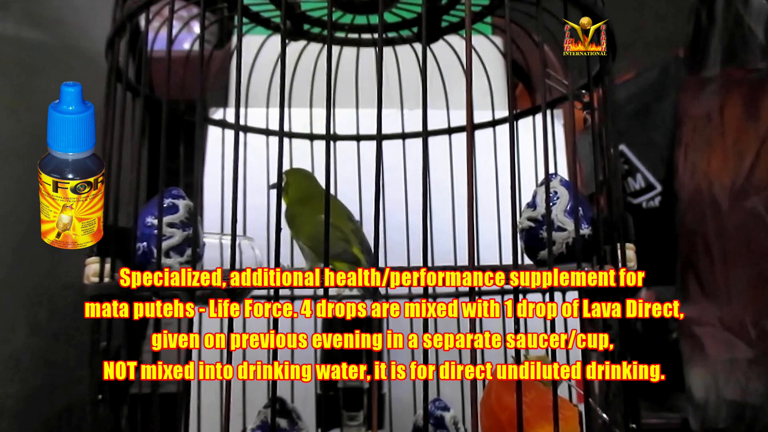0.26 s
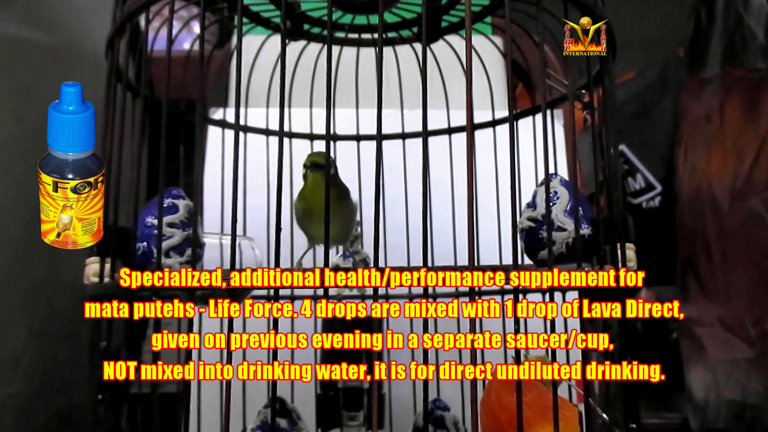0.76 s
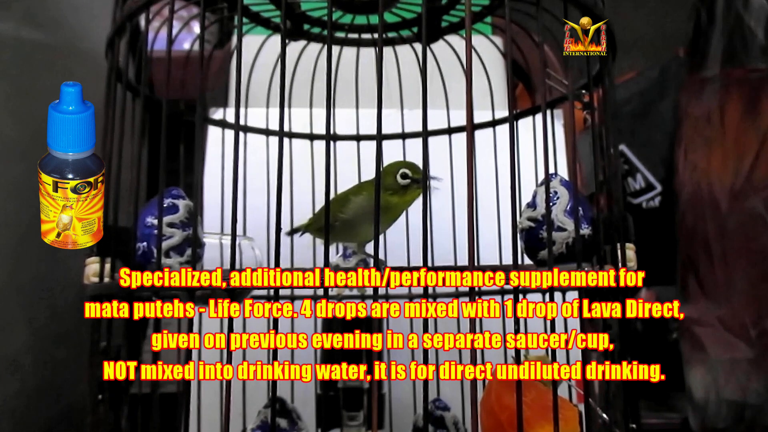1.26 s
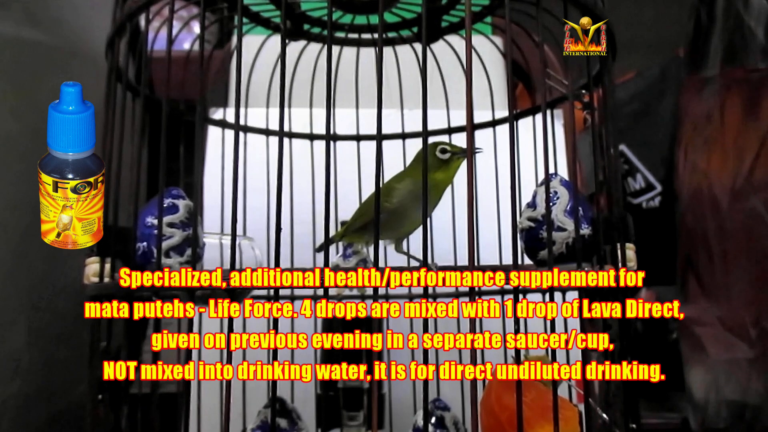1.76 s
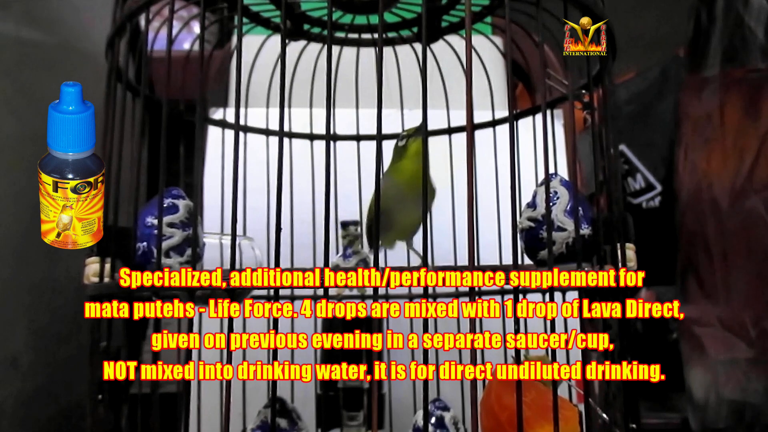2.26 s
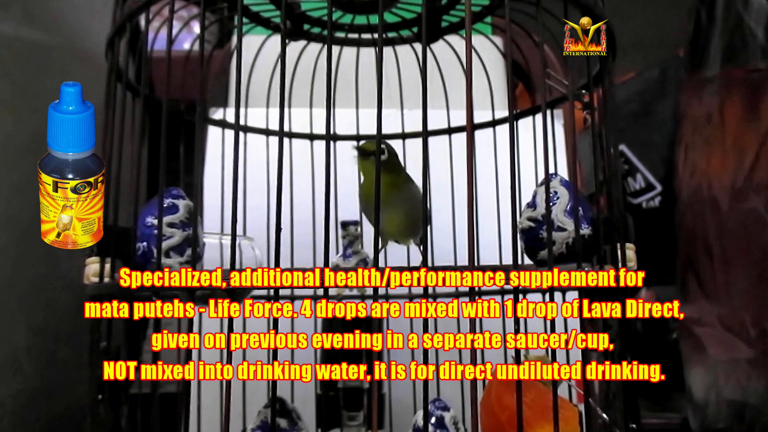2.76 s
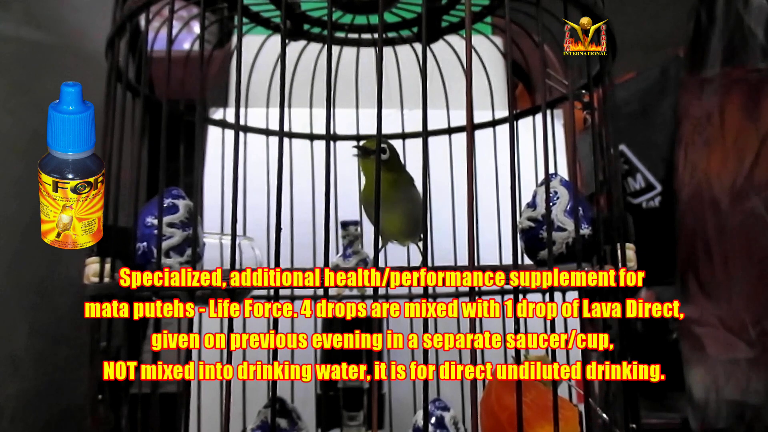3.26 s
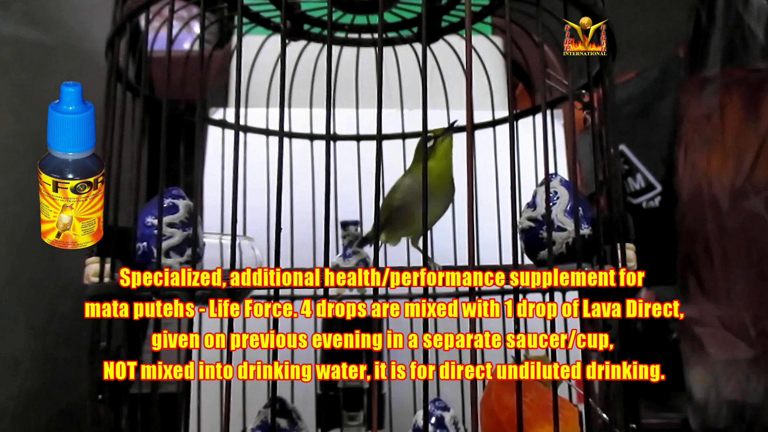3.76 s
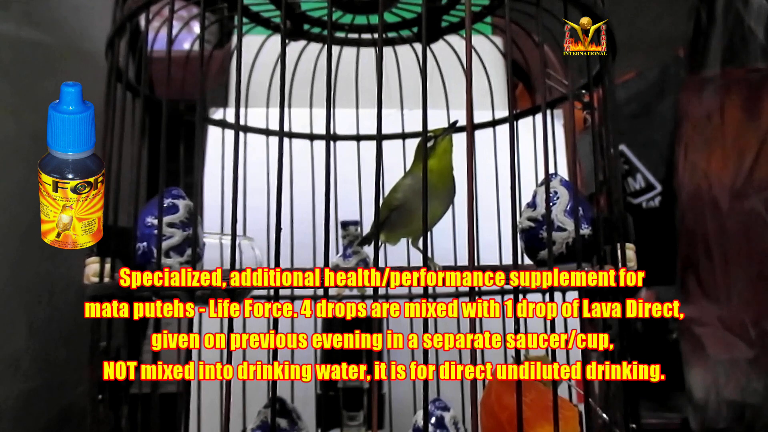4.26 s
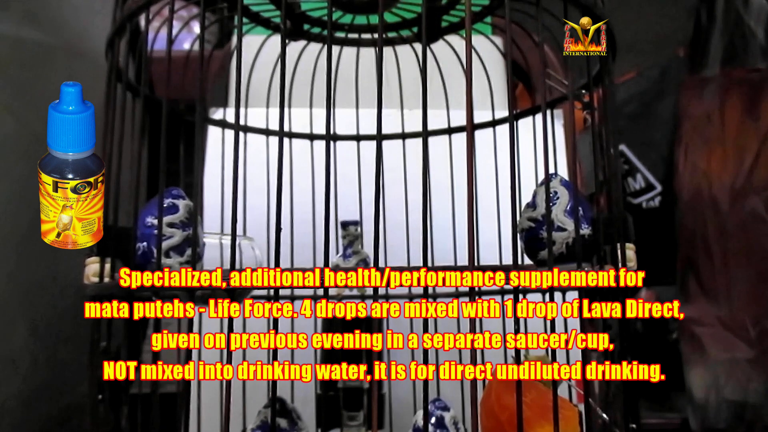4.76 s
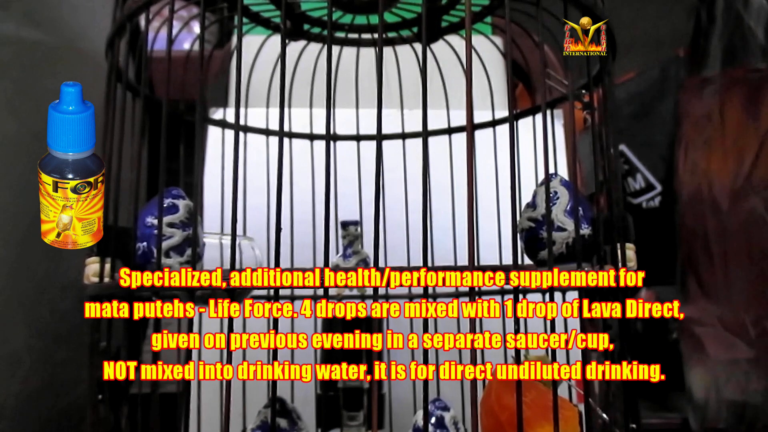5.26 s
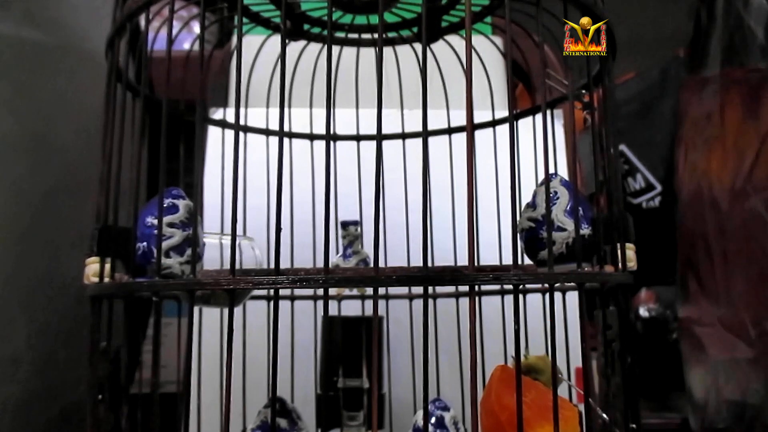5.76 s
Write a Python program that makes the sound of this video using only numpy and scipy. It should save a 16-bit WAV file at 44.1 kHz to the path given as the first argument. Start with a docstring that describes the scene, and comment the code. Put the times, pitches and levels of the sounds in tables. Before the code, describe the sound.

A small caged bird chirps close by in quick, high, falling notes, with a fainter bird answering over a low hum and distant traffic.

```python
"""Over an appliance hum and dull traffic, a caged white-eye starts a run of slurred, finely trilled chirps
close to the microphone. A hard wall returns each chirp once and the small room rings after it.
A second bird answers from further off. After a second or so the singer starts to flutter between phrases;
from two seconds on, some of its notes step down between two held pitches, and a far engine swells
and slowly gathers speed under the song until the end."""
import sys
import numpy as np
from scipy import signal
from scipy.fft import rfft, irfft
from scipy.io import wavfile
from scipy.ndimage import uniform_filter1d

SR = 44100
rng = np.random.default_rng(int(sys.argv[2]) if len(sys.argv) > 2 else 0)


def store_pcm(level_fs):
    """Save levels as 16-bit WAV."""
    pcm = np.round(np.clip(level_fs, -1, 1) * 32767).astype(np.int16)
    wavfile.write(sys.argv[1], SR, np.atleast_2d(pcm).T)


N = 265041

# what a bird's throat and beak let through: (frequency [Hz], gain [dB])
THROAT = [(2200, -15.5), (2900, -4), (3500, -7.5), (4500, 0.5), (5800, 5), (6800, -5), (8500, -11),
          (11000, -20.5), (15000, -24.5)]
TOP_HZ = 15450


def near_bird():
    """The caged singer; its snaps leave a nearly closed beak, so they stay dull and dry."""
    # falling chirps: (start [s], length [s], first pitch [Hz], crest pitch [Hz], last pitch [Hz],
    # time to crest [s], bend [1 straight, 3 drops fast and lingers], level [dB], opening flick [s],
    # overtones [dB], treble beamed at the wall [dB])
    slurs = [(-.008, .127, 5030, 4837, 3574, 0.0041, 1.46, -23.5, 0.0093, -34.5, 14),
             (.319, 0.15, 4720, 5160, 3680, 0.032, 1.34, -21.5, .011, -33, 11),
             (.612, 0.12, 5320, 5390, 3467, 0.0059, 1.4, -23.5, 0.0086, -42.5, 7),
             (0.881, .13, 4523, 4540, 3187, 0.034, 1.04, -23, 0.0086, -42.5, 10.5),
             (1.232, 0.091, 4230, 4050, 3320, 0.027, 2.65, -27, 0.0097, -43, 4),
             (1.394, .12, 5230, 5125, 3197, 0.024, 1.46, -22, .0096, -43.5, 21),
             (1.791, 0.12, 4980, 5190, 3170, 0.0053, 1.15, -23, 0.0076, -44.5, 9),
             (2.503, .12, 4640, 5085, 3415, 0.023, 2.9, -23, .01, -39.5, 13.5),
             (2.749, .126, 4530, 4673, 3290, 0.049, 1.05, -21, 0.0078, -44, -5),
             (3.134, 0.13, 5250, 5176, 3220, 0.0093, 1.32, -22, 0.0073, -42.5, 13.5),
             (3.407, .077, 4560, 4590, 3480, 0.0044, 2.3, -25.5, .011, -37, 13),
             (3.559, .128, 4370, 4565, 3155, 0.017, 1.22, -19.5, .01, -46.5, 25),
             (4.444, 0.092, 4534, 4475, 3817, 0.025, 2.9, -20, .014, -33.5, 19),
             (4.607, 0.13, 4040, 4880, 3407, 0.029, 1.73, -22, 0.0065, -32, 17.5),
             (4.904, .13, 5090, 5220, 3763, .027, 2.7, -23, 0.0099, -43, 1),
             (5.686, .12, 4794, 5054, 3395, .022, 2.45, -23, .01, -47, 11),
             (5.956, 0.087, 4492, 4750, 3250, 0.059, 1.3, -20.5, 0.0053, -41, -2)]
    # two-pitch chirps: (start [s], length [s], upper pitch [Hz], lower pitch [Hz], time to crest [s],
    # level [dB], overtones [dB], treble beamed at the wall [dB])
    steps = [(2.09, .12, 4670, 4140, 0.12, -13, -42.5, 10.5),
             (2.29, 0.1, 5660, 4855, 0.034, -21.5, -32.5, 18),
             (3.775, 0.088, 5626, 4788, 0.039, -21, -36.5, -6.5),
             (5.255, .13, 4580, 4131, 0.044, -19.5, -47, 9),
             (5.455, 0.099, 5790, 4870, 0.0068, -23, -31, 4.5)]
    song, beamed, snaps = np.zeros((3, N))
    for note, rows in ((slur, slurs), (step, steps)):
        for start, *shape, beam_db in rows:
            voice, onset = note(*shape)
            direct, to_wall = beak(voice, beam_db)
            add(song, start, direct)
            add(beamed, start, to_wall)
            add(snaps, start, onset)
    return echoes(song, beamed) + band(snaps, 1000, 10000)


def slur(length, first_hz, crest_hz, last_hz, crest_s, bend, db, flick_s, overtone_db,
         smooth_below_hz=3310, trill_onset_s=0.024):
    """The pitch leans to a crest and falls away; a late crest begins with hardly any trill."""
    t = np.linspace(0, length, 40)
    fall_left = np.clip((length - t) / (length - crest_s), 0, 1) ** bend
    pitches = np.interp(t, [0, crest_s], [first_hz, crest_hz]) - (crest_hz - last_hz) * (1 - fall_left)
    depth_hz = 0.13 * (crest_hz - smooth_below_hz)  # higher notes trill deeper
    early_hz = depth_hz * np.exp(-(crest_s / trill_onset_s) ** 2 / 2)
    levels_db = db + effort(t, crest_s)
    return chirp(length, pitches, levels_db, (early_hz, depth_hz), flick_s, overtone_db, falling=True)


def step(length, upper_hz, lower_hz, crest_s, db, overtone_db, depths_hz=(165, 150), flick_s=0.0078):
    """A trilled upper pitch drops quickly at mid-note to a pure, held lower one."""
    t = np.linspace(0, length, 40)
    dropped = (1 + np.tanh((t / length - .5) / .1)) / 2
    pitches = upper_hz + (lower_hz - upper_hz) * dropped
    return chirp(length, pitches, db + effort(t, crest_s), depths_hz, flick_s, overtone_db, falling=False)


def effort(t, crest_s, swell_db_per_s=135, ease_db_per_s=24.5, release_db_per_s=214, release_at_s=0.092):
    """A note's envelope in dB: effort swells until just past the crest, eases, gives out on long notes."""
    past_peak = t - crest_s - 0.0035
    return (swell_db_per_s * np.minimum(past_peak, 0) - ease_db_per_s * np.maximum(past_peak, 0)
            - release_db_per_s * np.maximum(t - release_at_s, 0))


def chirp(length, pitches, levels_db, depths_hz, flick_s, overtone_db, falling,
          trill_hz=110.3, scoop=0.52, sag_s=0.0031, jitter=.007, fade_s=0.0035):
    """One note and its opening snap: the syrinx flicks up to pitch, trills, then smooths out."""
    size = int(length * SR)
    t = np.arange(size) / SR
    progress = (t - flick_s) / (length - flick_s)
    flick_left = np.clip(1 - t / flick_s, 0, 1)
    trill = np.sin(turn(trill_hz * (1 + 0.098 * walk(60.4, size))) - 2 * np.pi * trill_hz * flick_s)
    early_hz, middle_hz = depths_hz
    depth_hz = np.interp(progress, [.1, .42, .68, 1], [early_hz, middle_hz, middle_hz / 5, 0])
    hz = (along(progress, pitches) + trill * depth_hz) * (1 - scoop * flick_left)
    # a falling note stumbles on its way down and sags as the syrinx closes
    stumble = .011 * walk(70, size) * np.clip(2 * progress, 0, 1)
    sag = 0.15 * np.exp((t - length) / sag_s)
    hz *= 1 + falling * (stumble - sag)
    # the voice is unsteady while it trills and almost pure otherwise
    unsteady = np.maximum(depth_hz / max(depths_hz), .25)
    phase = turn(hz * (1 + jitter * unsteady * walk(900, size)))
    db = along(progress, levels_db) + 2.5 * unsteady * walk(200, size)
    whistle = gain_at(hz, THROAT) * np.sin(phase) * undb(db) * (1 - flick_left) ** 2.18
    rasp_db = max(levels_db) + 0.51 * (db - max(levels_db))  # fades more slowly than the whistle
    edge = rasp(hz, phase, overtone_db) * undb(rasp_db) * (1 - flick_left) ** 5
    fade = np.clip((length - t) / fade_s, 0, 1)
    return np.sqrt(2) * (whistle + edge) * fade, snap(hz, phase, flick_left, flick_s)


def rasp(hz, phase, overtone_db, patchy_db=5.5, roughness=0.19, undertone_db=-40, hiss_db=-9):
    """Hiss and patchy partials: the whistle is the second partial of a weak tone an octave below it."""
    size = len(hz)
    # (ratio to the whistle, level [dB])
    partials = [(1.5, -9), (2, 0), (2.5, -9), (3, 1), (3.5, -9)]
    overtones = np.zeros(size)
    for ratio, db in partials:
        flicker = undb(db + patchy_db * walk(45, size)) * (1 + roughness * walk(700, size))
        overtones += flicker * gain_at(ratio * hz, THROAT) * (ratio * hz < SR / 2) * np.sin(ratio * phase)
    undertone = undb(undertone_db + patchy_db * walk(43, size)) * np.sin(phase / 2)
    hiss = undb(hiss_db) * colour(band(rng.standard_normal(size), 7700, TOP_HZ), THROAT)
    return undb(overtone_db) * (overtones + hiss) / gain_at(8890, THROAT) + undertone


def snap(hz, phase, flick_left, flick_s, db=-44):
    """Raspy attack as the flick's octave sweeps through the throat resonance; a slow flick hits harder."""
    envelope = np.sqrt(np.sin(np.pi * flick_left).clip(0))
    sweep = gain_at(2 * hz, THROAT) * np.sin(2 * phase) + np.sin(phase) / 5
    force = undb(db) * (flick_s / 0.0087) ** 4
    grit = 1 + walk(2500, len(hz))
    return envelope * sweep * force * grit


def beak(voice, beam_db, closed_db=-7, open_db=-1, opening_s=0.12):
    """The top overtones swell as the beak opens; returns the direct sound and the send to the wall."""
    treble = colour(voice, [(9000, -60), (11500, 0)])
    gape = undb(np.interp(np.arange(len(voice)) / SR, [0, opening_s], [closed_db, open_db]))
    return voice + treble * (gape - 1), voice + treble * (gape * undb(beam_db) - 1)


def echoes(direct, beamed, cage_s=0.0016, cage_db=-13, wall_s=.0178, wall_db=-4.0, room_db=-8.5):
    """The beak beams most notes' treble past the microphone, so wall and room answer brighter."""
    out = direct + undb(room_db) * room(beamed, t60_s=0.31)
    add(out, cage_s, undb(cage_db) * direct)
    add(out, wall_s, undb(wall_db) * beamed)  # beats against the gliding pitch
    return out


def room(x, t60_s, treble_t60_s=0.18, build_s=0.0027, split_hz=6500):
    """Diffuse ring of the room; the treble dies sooner."""
    t = np.arange(SR) / SR
    noise = rng.standard_normal(SR)
    body = band(noise, 300, split_hz) * undb(-60 * t / t60_s)
    treble = band(noise, split_hz, TOP_HZ) * undb(-60 * t / treble_t60_s)
    ring = (body + treble) * (1 - np.exp(-t / build_s))
    return signal.fftconvolve(x, ring / np.sqrt(2 * np.sum(ring ** 2)))[:N]


def far_bird(depths_hz=(150, 150), flick_s=0.0088, overtone_db=-54, swell_db=7):
    """A second bird answers with trilled slurs, each swelling from a soft start."""
    # (start [s], length [s], first pitch [Hz], last pitch [Hz], level [dB])
    answers = [(0.081, 0.053, 4245, 3305, -31.5), (0.26, 0.049, 5620, 3990, -41),
               (1.67, 0.1, 5320, 3450, -44), (1.924, 0.0997, 5020, 4240, -44),
               (3.013, 0.082, 4400, 3250, -43.5), (3.28, 0.069, 4510, 3610, -40),
               (3.387, 0.27, 5030, 4190, -41), (3.888, 0.12, 4410, 3310, -41.5),
               (4.095, 0.17, 5054, 3413, -43.5), (4.188, 0.13, 4835, 3580, -39),
               (4.396, 0.053, 5260, 4940, -45)]
    song = np.zeros(N)
    for start, length, *pitches, db in answers:
        levels_db = [db - swell_db, db, db]
        voice, _ = chirp(length, pitches, levels_db, depths_hz, flick_s, overtone_db, falling=True)
        add(song, start, voice)
    return song


def wings(wingbeat_hz=22.76, beat_depth=.5):
    """Soft flurries of air pulse with the wingbeat as the singer hops about its cage."""
    # (start [s], length [s], level [dB])
    flutters = [(1.346, .5, -54), (2.083, 0.24, -58), (2.97, .25, -55), (3.378, .38, -52.5),
                (4.28, 0.46, -52)]
    # the rush of air off the wings: (frequency [Hz], gain [dB])
    rush = [(200, -15.5), (300, -3.5), (390, 6.5), (470, -2), (560, -7.5), (690, -8), (840, 0.5),
            (1200, -11), (3000, -31), (12000, -81.5)]
    flurries = np.zeros(N)
    for start, length, db in flutters:
        add(flurries, start, undb(db) * np.sqrt(np.hanning(int(length * SR))))
    beat = 1 + beat_depth * np.sin(turn(wingbeat_hz * (1 + .15 * walk(8.1))))
    return flurries * beat * unit(colour(rng.standard_normal(N), rush))


def hum(waver_db=1, drift=0.0019):
    """An appliance motor holds three low, barely wavering tones."""
    # (frequency [Hz], rms level [dB])
    tones = [(161.5, -53.5), (362, -62), (544, -65)]
    return sum(np.sqrt(2) * undb(db + waver_db * walk(4.2)) * np.sin(turn(hz * (1 + drift * walk(4.135))))
               for hz, db in tones)


def street(traffic_trim_db=2.26, waver_db=3, unevenness=0.01055, rolloff=0.68):
    """Dull traffic and one accelerating engine whose partials swell as they cross the room resonances."""
    # the far engine: (time [s], firing rate [Hz], level [dB])
    revs = [(0, 45.2, -81), (1.501, 49.07, -71), (2.601, 56.67, -53), (3.299, 62.86, -54.5),
            (4.4, 71.9, -57), (5.198, 75.9, -57.5), (6, 81.4, -59)]
    # the traffic wash: (time [s], level [dB])
    traffic = [(0.0, -50.5), (1.2, -55.5), (1.34, -52), (4.28, -52), (5.94, -55), (6.01, -53.5)]
    # what the walls and low room resonances let in: (frequency [Hz], gain [dB])
    indoors = [(35, -2.5), (64, -2.5), (85, 2), (135, 2.5), (200, -6), (232, 5), (258, -2.5), (385, -2.5),
               (470, -4), (850, -4.5), (1300, -12.5), (2200, -17.5), (6000, -27), (15000, -67.5)]
    t = np.arange(N) / SR
    times, rates_hz, levels_db = np.transpose(revs)
    hz, db = np.interp(t, times, rates_hz), np.interp(t, times, levels_db)
    phase = turn(hz * (1 + unevenness * walk(10)))
    engine = sum(undb(db + waver_db * walk(2.5)) * gain_at(k * hz, indoors) * np.sin(k * phase)
                 / k ** rolloff for k in range(1, 7))
    wash = unit(colour(rng.standard_normal(N), indoors))
    wash_db = np.interp(t, *np.transpose(traffic)) + traffic_trim_db
    return np.sqrt(2) * engine + wash * undb(wash_db)


def undb(db):
    """Decibels to gain."""
    return 10 ** (np.asarray(db) / 20)


def unit(x):
    """Scale to rms 1."""
    return x / np.sqrt(np.mean(x ** 2))


def gain_at(hz, curve):
    """Linear gain at hz of an EQ curve of (frequency [Hz], gain [dB]) points."""
    at, db = np.transpose(curve)
    return undb(np.interp(np.log(np.maximum(hz, 1)), np.log(at), db))


def colour(x, curve):
    """Filter through an EQ curve."""
    return irfft(rfft(x) * gain_at(np.fft.rfftfreq(len(x), 1 / SR), curve), len(x))


def band(x, lo_hz, hi_hz):
    """Band-pass."""
    return signal.sosfilt(signal.butter(3, [lo_hz, hi_hz], "band", fs=SR, output="sos"), x)


def walk(rate_hz, size=N):
    """Smooth random drift, spread near 1."""
    hold = int(SR / rate_hz)
    return uniform_filter1d(np.repeat(rng.standard_normal(size // hold + 1), hold), hold)[:size]


def along(progress, values):
    """Glide through evenly spaced values over the course 0-1 of a note."""
    return np.interp(progress, np.linspace(0, 1, len(values)), values)


def turn(hz):
    """Phase of a moving frequency."""
    return 2 * np.pi * np.cumsum(hz) / SR


def add(track, start, sound):
    """Mix a sound into the track at its start time."""
    at = int(start * SR) + np.arange(len(sound))
    inside = (at >= 0) & (at < N)
    track[at[inside]] += sound[inside]


def scene(far_direct_db=-14, far_t60_s=0.67):
    """The mono mix: the near bird mostly direct, the far one mostly through the room, over the low bed."""
    far = far_bird()
    birds = near_bird() + undb(far_direct_db) * far + room(far, far_t60_s)
    return (birds + wings() + hum() + street())[None]


def record(dry):
    """A steep low-pass cuts the very top."""
    return signal.sosfilt(signal.ellip(8, .2, 70, TOP_HZ, fs=SR, output="sos"), dry)


dry = scene()
out = record(dry)
store_pcm(out)
```